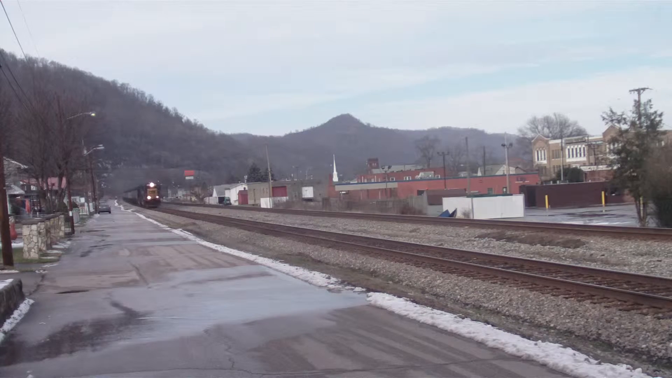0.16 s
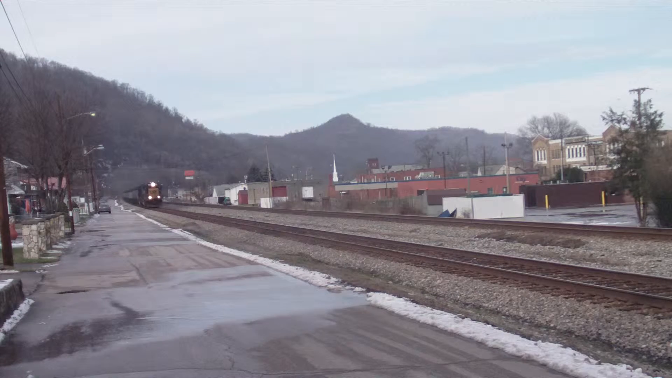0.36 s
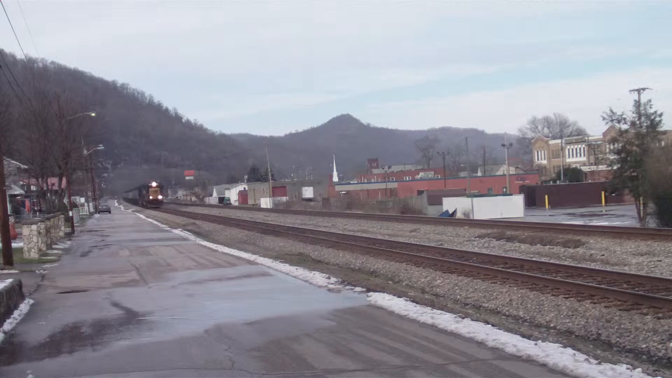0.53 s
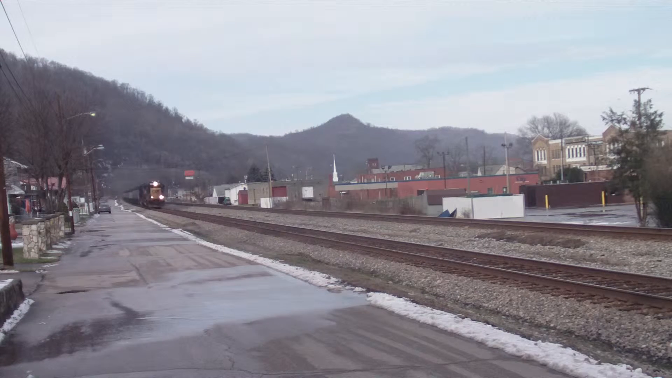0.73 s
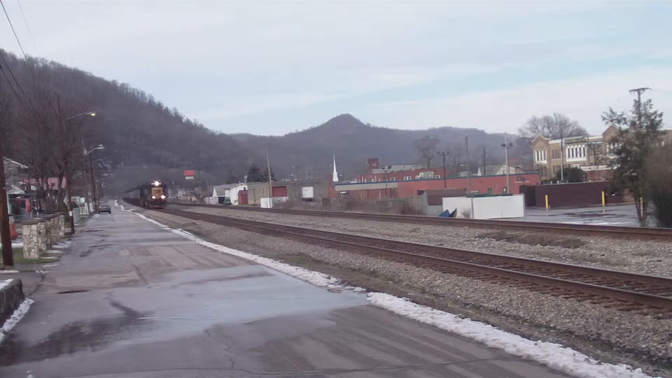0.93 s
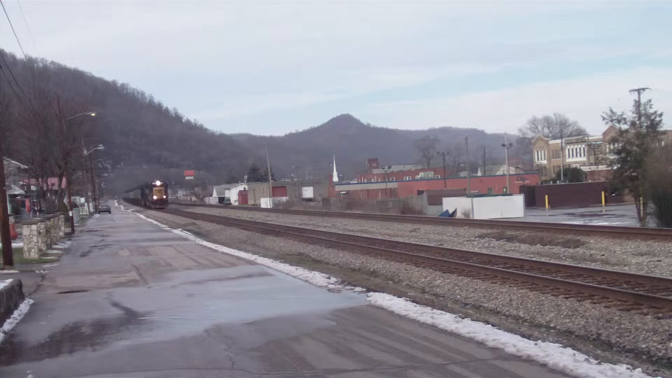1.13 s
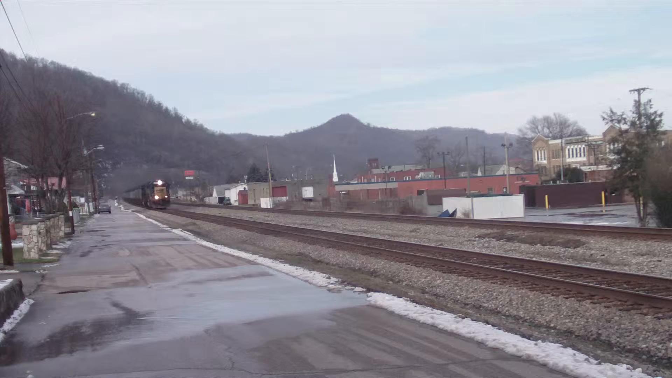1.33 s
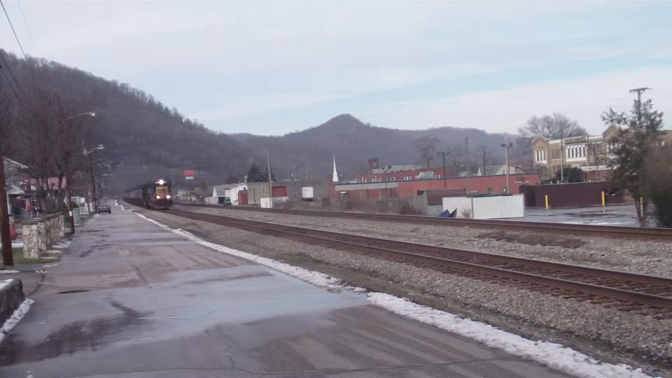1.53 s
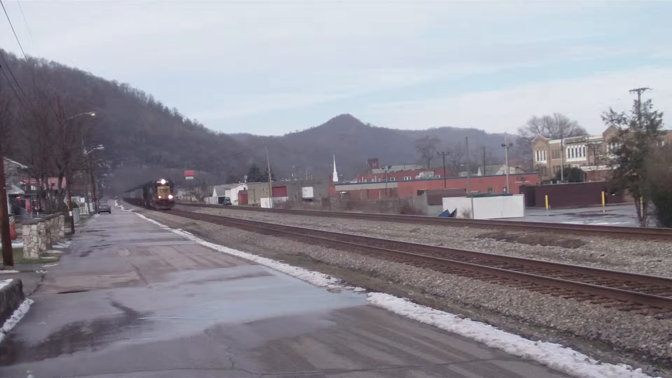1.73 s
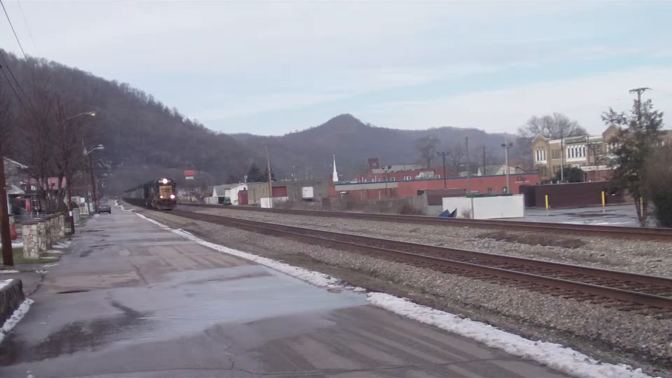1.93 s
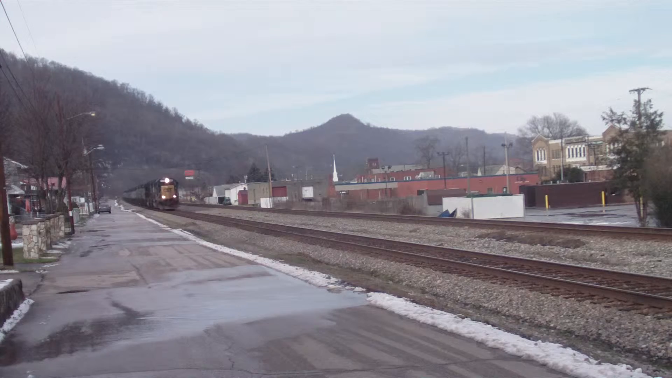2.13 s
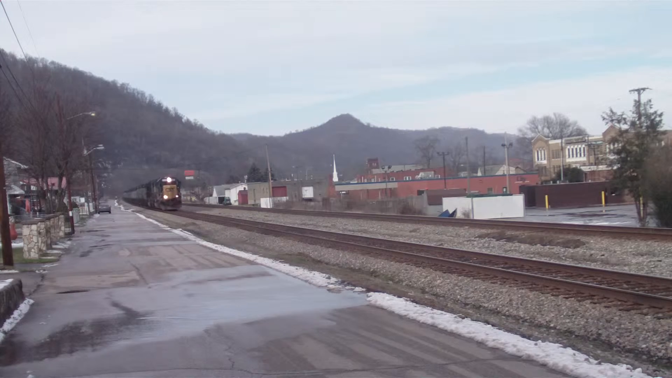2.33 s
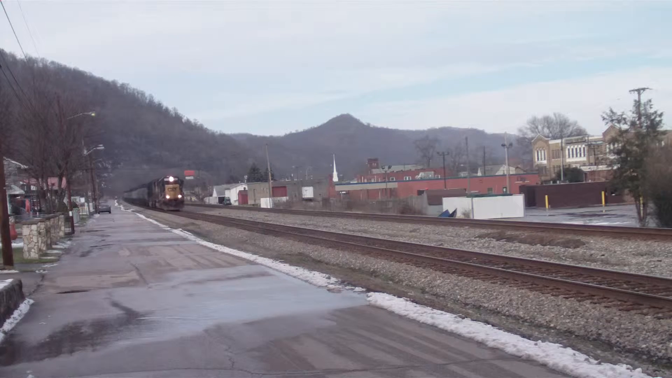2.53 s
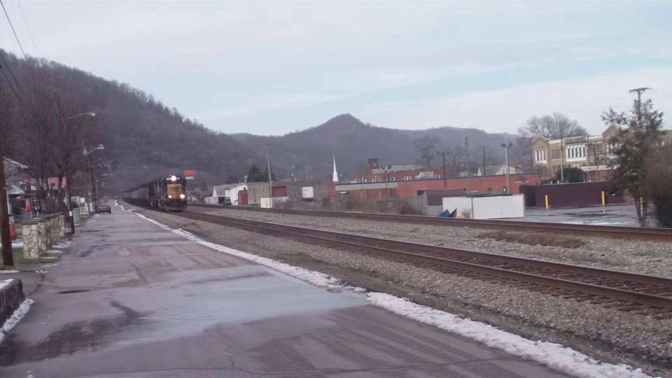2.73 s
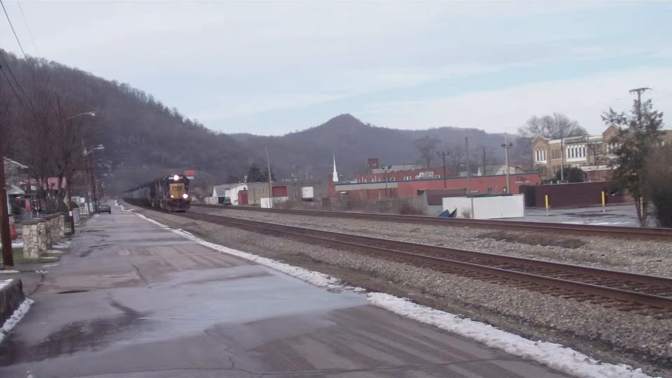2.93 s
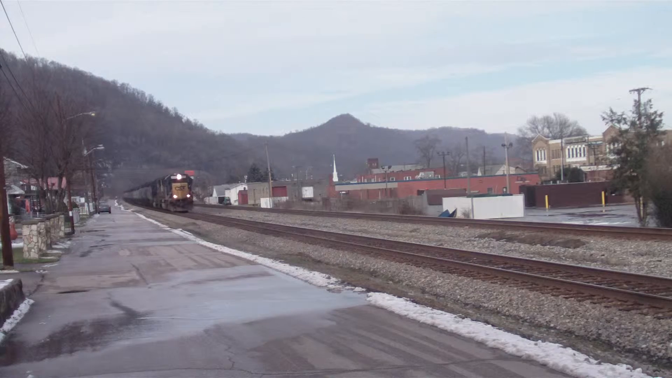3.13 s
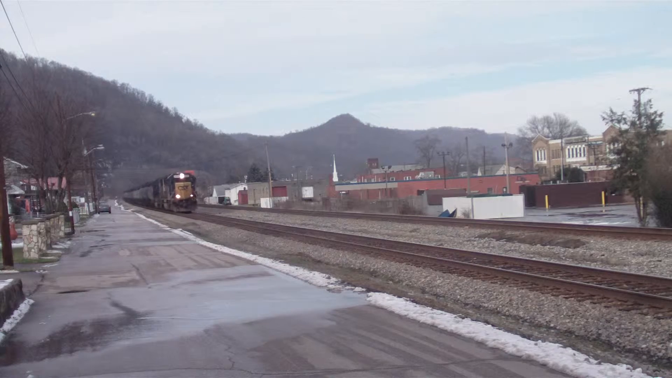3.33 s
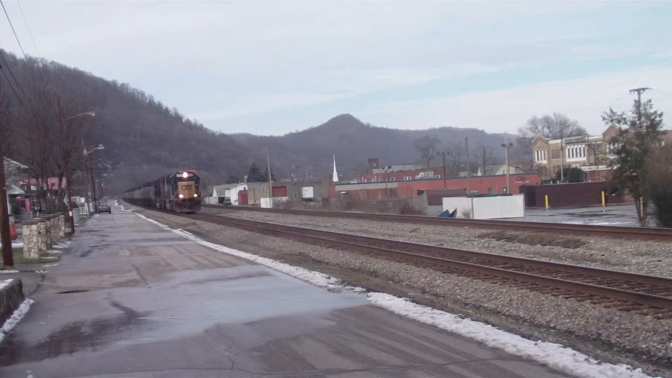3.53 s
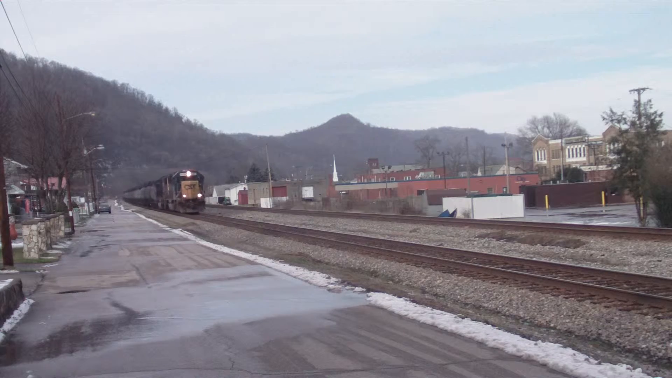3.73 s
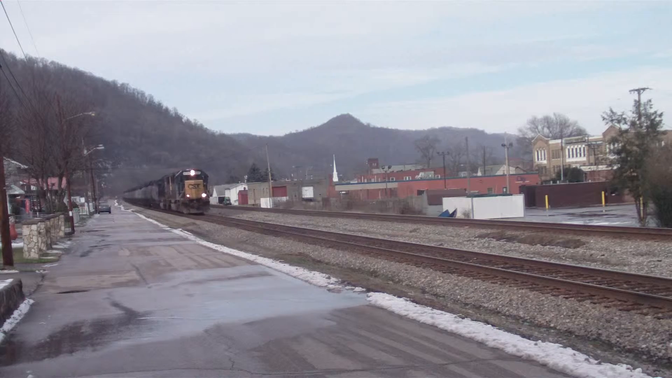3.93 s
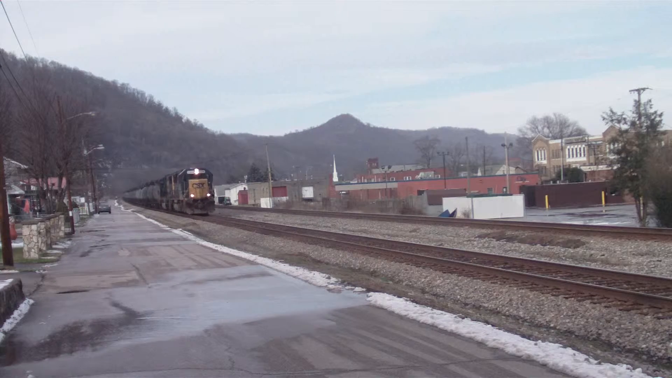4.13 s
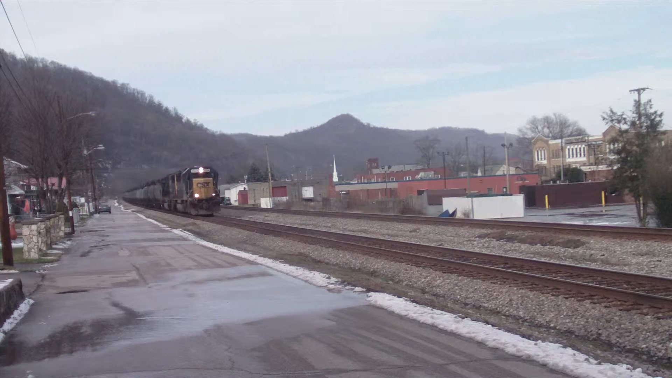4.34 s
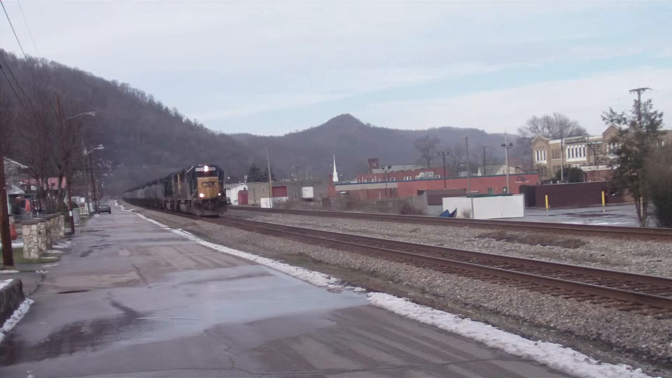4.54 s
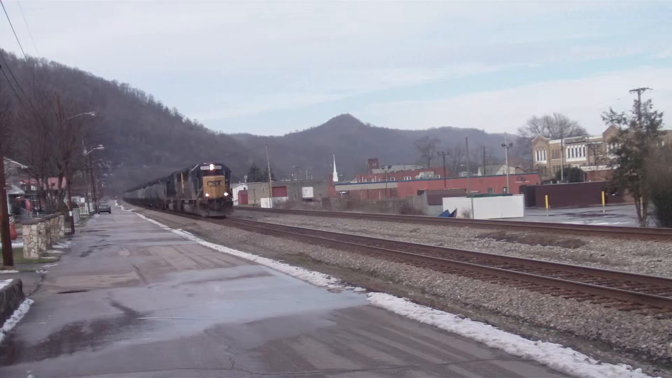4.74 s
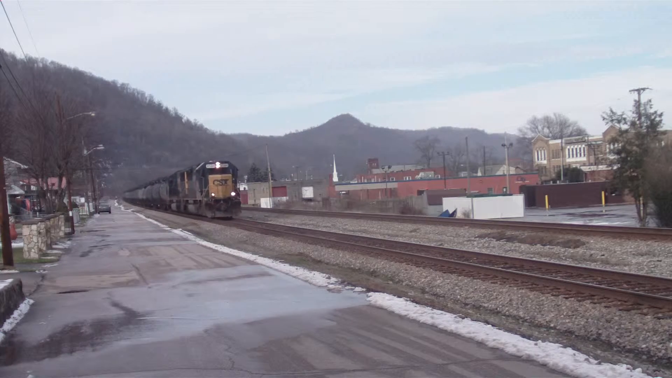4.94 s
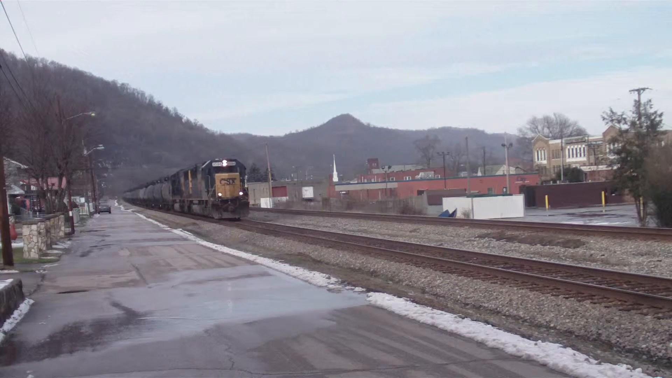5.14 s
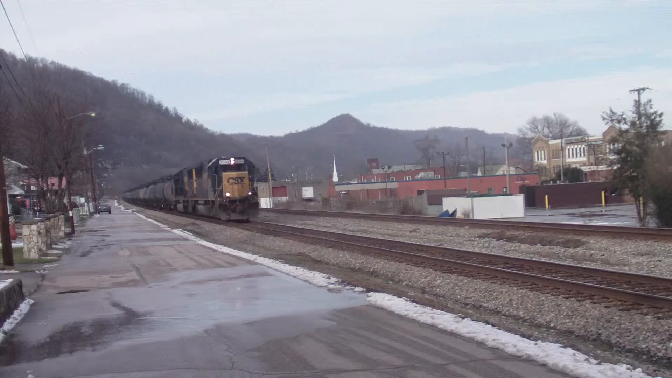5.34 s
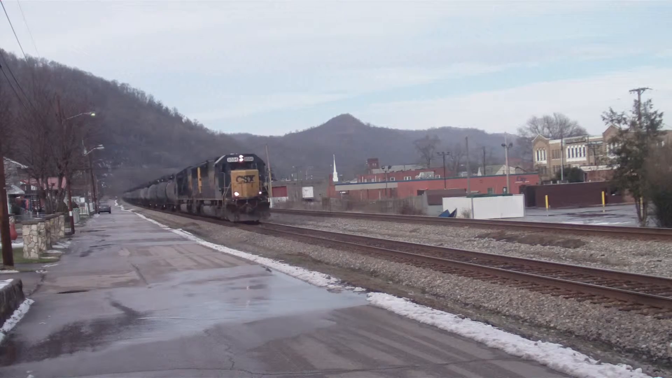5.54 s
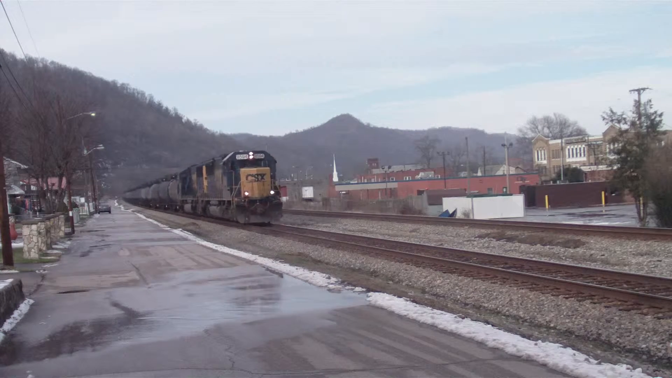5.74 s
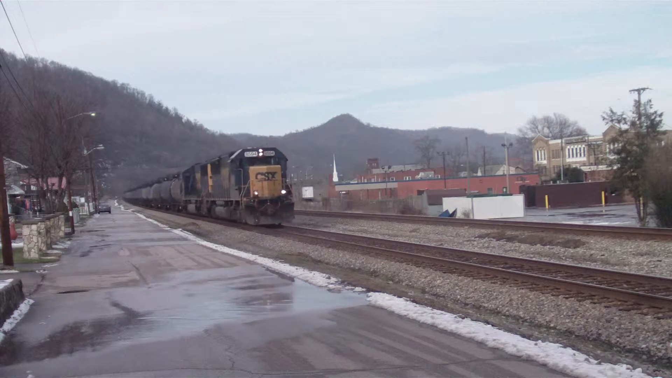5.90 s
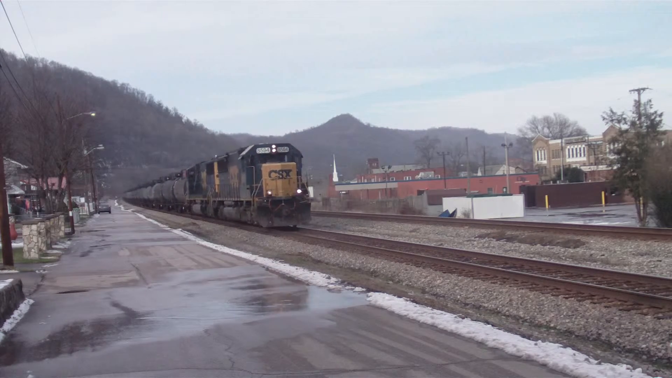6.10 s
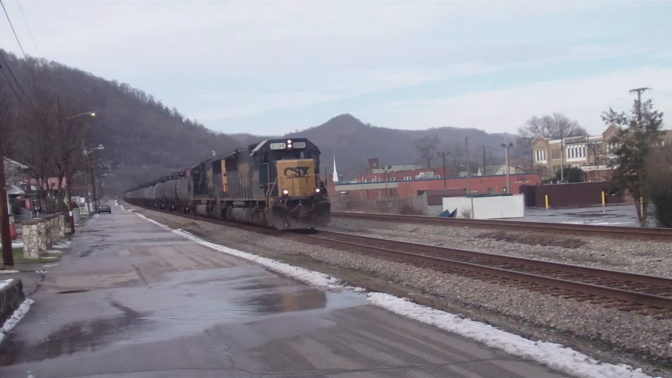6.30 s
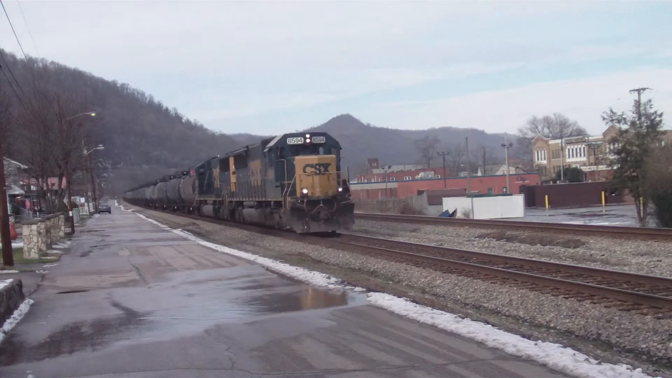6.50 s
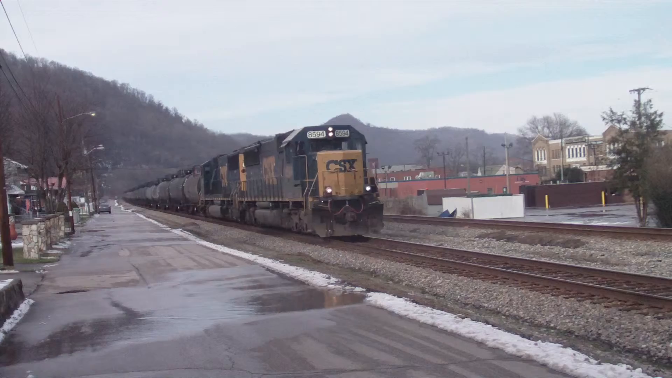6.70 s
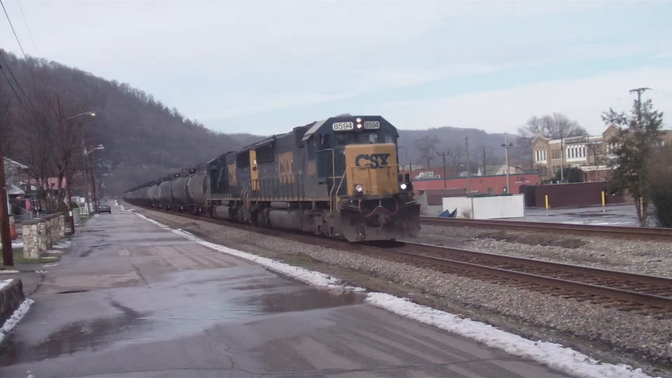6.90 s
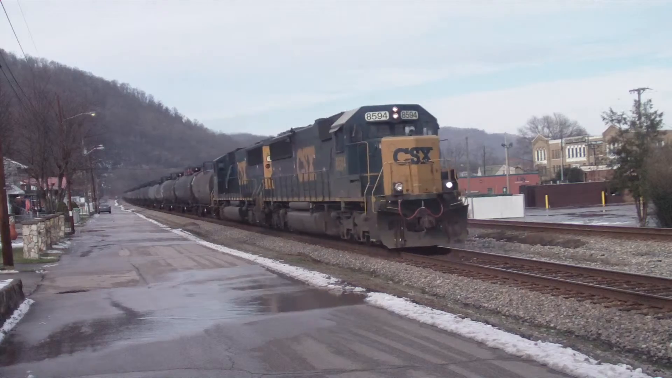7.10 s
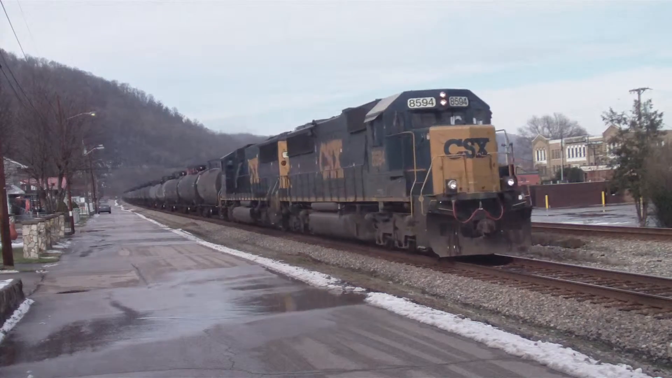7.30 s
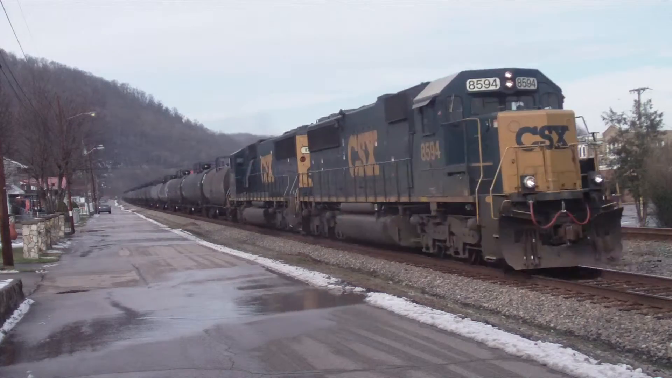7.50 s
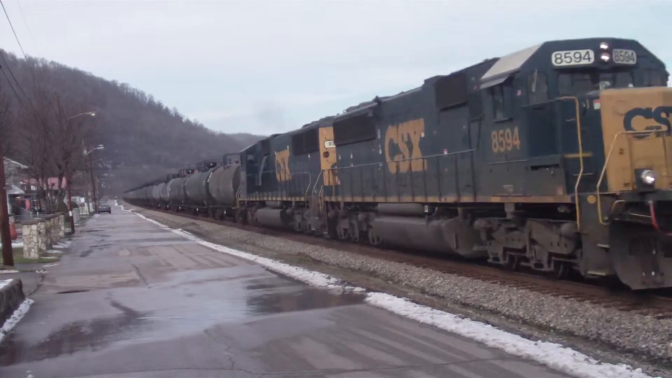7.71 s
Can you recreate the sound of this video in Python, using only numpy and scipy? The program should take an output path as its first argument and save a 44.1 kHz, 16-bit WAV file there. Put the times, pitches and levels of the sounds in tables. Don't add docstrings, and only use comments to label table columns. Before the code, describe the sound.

A freight train hauled by several diesel locomotives rolls closer outdoors, deep throbbing rumble swelling from distant murmur to overwhelming close roar, with gear whine and hissing rails.

```python
import sys
import numpy as np
from scipy import signal
from scipy.fft import rfft, irfft
from scipy.io import wavfile
from scipy.ndimage import uniform_filter1d

SR = 44100
rng = np.random.default_rng(int(sys.argv[2]) if len(sys.argv) > 2 else 0)


def to_linear_factor(level_db):
    exponent = np.asarray(level_db, float) / 20
    return 10 ** exponent


def transcribe(u):
    v = np.clip(np.atleast_2d(u).T, -1, 1)
    q = np.round(v * 32767).astype(np.int16)
    wavfile.write(sys.argv[1], SR, q)


N = 342216
T = np.arange(N) / SR
HOP = 256


def curve(table, at=T):
    s, *columns = np.transpose(table)
    return np.array([np.interp(at, s, c) for c in columns])


def colour(points, hz):
    f, db = np.transpose(points)
    return np.interp(np.log(hz + 1), np.log(f), db)


def walk(rate, count):
    k = max(int(SR / HOP / rate), 1)
    frames = N // HOP + 20
    held = np.repeat(rng.standard_normal((count, frames // k + 1)), k, axis=1)
    slewed = uniform_filter1d(uniform_filter1d(held, k), k)
    return 1.3 * slewed[:, :frames]


def stepped_walk(rate, count):
    return np.repeat(walk(rate, count), HOP, axis=1)[:, :N]


def shaped(db_of, size=2048):
    hz, s, z = signal.stft(rng.standard_normal(N), SR, nperseg=size, noverlap=size - HOP)
    gain = to_linear_factor(db_of(hz[:, None], s)) * np.sqrt(SR / 2)
    return signal.istft(z * gain, SR, nperseg=size, noverlap=size - HOP)[1][:N]


def flicker(hz, frames, slow_db, quick_db):
    band = (3 * np.log2(1 + hz[:, 0] / 30)).astype(int)
    slow = walk(1.5, count=10)[band // 3]
    quick = walk(9, count=30)[band]
    return (slow_db * slow + quick_db * quick)[:, :frames]


def band_level(db, hz, lo_hz, hi_hz):
    inside = (hz > lo_hz) & (hz < hi_hz)
    return 10 * np.log10(np.sum(to_linear_factor(2 * db[inside])) * hz[1, 0])


def add(out, s, sound):
    i = int(s * SR)
    out[i:i + len(sound)] += sound[:N - i]


def band_noise(size, hz, width_hz):
    bins_hz = np.arange(2049) * SR / 4096
    bell = np.exp(-2 * ((bins_hz - hz) / width_hz) ** 2)
    x = irfft(rfft(rng.standard_normal(4096)) * bell)
    return np.resize(x / x.std(), size)


SPEED_M_S, ARRIVES_S, TRACK_M = 15, 8.85, 5


def distance(at):
    return np.hypot(SPEED_M_S * (ARRIVES_S - at), TRACK_M)


def carried(source, at=T):
    near_db, fall_db, loss_db, floor_db = source
    db = near_db - fall_db * np.log10(distance(at) / 10) - loss_db * distance(at)
    return 10 * np.log10(to_linear_factor(2 * db) + to_linear_factor(2 * floor_db))


def swells(table, at=T):
    return sum(db * np.exp(-((at - s) / half) ** 2) for s, db, half in table)


# frequency in Hz, density in dB per Hz.
STREET_COLOUR = [(300, -33.5), (500, -4), (800, 2), (1050, -8), (1600, 2.5), (2500, -18.5), (4000, -44),
                 (6000, -48), (9000, -42.5), (12000, -46), (13000, -47), (15300, -50)]


def street():
    hum = shaped(lambda hz, s: colour(STREET_COLOUR, hz) + flicker(hz, len(s), 0.37, 0.33))
    return to_linear_factor(-53) * hum / hum.std()


# start in seconds, length in seconds, step rate in Hz.
LENS_STEP = (4.109, .019, 1569)
# multiple of the step rate, level in dB.
LENS_OVERTONES = [(4, -58), (5, -49.5), (6, -64), (7, -62), (8, -61)]
# first in seconds, period in seconds, length in seconds, tone in Hz, level in dB.
MOTOR_PIPS = (.004, .1002, .022, 10370, -82)


def camera_motors():
    out = np.zeros(N)
    s, length, hz = LENS_STEP
    u = T[T < length]
    edge = np.clip(np.minimum(u, length - u) / .0012, 0, 1)
    buzz = sum(to_linear_factor(db) * np.sqrt(2) * np.sin(2 * np.pi * k * hz * u) for k, db in LENS_OVERTONES)
    add(out, s, edge * buzz)
    first, period, length, hz, db = MOTOR_PIPS
    gate = (T - first) % period < length
    level = to_linear_factor(db + 2.5 * stepped_walk(8, count=1)[0])
    return out + level * np.sqrt(2) * gate * np.sin(2 * np.pi * hz * T)


# start in seconds, length in seconds, level in dB, then start, middle and end pitch in Hz.
CHIRP_GLIDES = [
    (.625, .045, -75, 5000, 7000, 7000),
    (4.502, .056, -59, 7550, 7350, 5700),
    (4.628, .035, -59, 5760, 5850, 5150),
    (0.548, 0.047, -50, 1530, 1580, 1600),
    (0.855, 0.11, -52, 1565, 1580, 1590),
    (1.178, .05, -52, 1530, 1560, 1600),
    (1.66, 0.04, -48, 1520, 1537, 1610),
    (1.92, 0.033, -46, 1480, 1574, 1580),
    (2.836, 0.054, -51, 1965, 2020, 2020),
    (3.1, 0.043, -50.5, 2240, 2240, 2230),
]


def chirps():
    out = np.zeros(N)
    for s, length, db, *hz in CHIRP_GLIDES:
        u = np.linspace(0, 1, int(length * SR))
        glide = np.polyval(np.polyfit([0, .5, 1], hz, 2), u)
        tone = np.sin(2 * np.pi * np.cumsum(glide) / SR)
        add(out, s, to_linear_factor(db) * np.sqrt(2 * np.sin(np.pi * u)) * tone)
    return out


# start in seconds, length in seconds, level in dB, centre in Hz, width in Hz.
FLANGE_RUBS = [(.83, .09, -72, 13700, 1200), (4.03, 0.089, -70, 14400, 1500),
               (4.572, .05, -60, 14000, 1490), (4.6, .12, -66, 13500, 200),
               (5.327, .08, -54.5, 13900, 1590), (6.187, .04, -58, 13500, 1500),
               (7.22, .035, -45.5, 14600, 1200), (7.25, 0.14, -58, 14800, 406),
               (7.735, 0.025, -46.5, 14600, 1500)]


def squeals():
    out = np.zeros(N)
    for s, length, db, hz, width_hz in FLANGE_RUBS:
        u = np.linspace(0, 1, int(length * SR))
        add(out, s, to_linear_factor(db) * np.sqrt(np.sin(np.pi * u ** .6)) * band_noise(len(u), hz, width_hz))
    return out


# start in seconds, level in dB, centre in Hz, width in Hz, 60 dB decay in seconds.
JOINT_TICKS = [(.0298, -56, 9000, 700, 0.025), (1.3713, -62, 6760, 2000, .08),
               (1.6033, -49, 4000, 6500, 0.11), (1.6154, -59, 4000, 6000, .06),
               (1.9194, -56, 6300, 2000, .02), (2.1256, -51, 5000, 4500, .07),
               (2.2274, -56, 8300, 2500, .02), (2.794, -51, 4500, 6000, .09),
               (3.0934, -60, 4530, 3000, .03), (3.1647, -56, 10500, 2500, 0.022),
               (3.2954, -55, 5000, 3000, .03), (4.3106, -54, 5500, 3000, .03),
               (4.5324, -56, 8500, 4000, .015), (5.05, -58, 9000, 2550, .02),
               (6.343, -36, 7500, 4000, 0.021), (7.4098, -23.5, 7600, 5930, 0.029),
               (6.868, -19.5, 417, 150, 0.33), (7.525, -23.5, 900, 2500, .2),
               (7.662, -19.5, 1210, 3190, 0.26), (7.53, -18, 436, 300, 0.27), (7.665, -18, 400, 250, .25)]


def ticks():
    out, t = np.zeros(N), T[:4096]
    for s, db, hz, width_hz, t60 in JOINT_TICKS:
        decay = to_linear_factor(db - 60 * t / max(t60, .003))
        attack = np.clip(30 * t / t60, 0, 1)
        add(out, s, decay * attack * band_noise(len(t), hz, width_hz))
    return out


# start in seconds, level in dB.
SNAP_EVENT = (5.7519, -22)
# frequency in Hz, level in dB, 60 dB decay in seconds.
SNAP_RINGS = [(3950, -1, 0.013), (4370, -6, 0.0095), (5500, -3, 0.0068), (7090, 2.5, 0.0065),
              (9000, -5, 0.0048), (10500, -3, .005), (12600, -15, 0.0046)]


def snap():
    out, t = np.zeros(N), T[:4096]
    s, snap_db = SNAP_EVENT
    modes = sum(to_linear_factor(snap_db + db - 60 * t / t60) * np.sin(2 * np.pi * hz * t) for hz, db, t60 in SNAP_RINGS)
    add(out, s, np.clip(t / .0003, 0, 1) * modes)
    return out


# centre in Hz, width in Hz, level in dB.
RAIL_HISS = [(11000, 250, -10), (11620, 420, -5), (11780, 80, -4), (12150, 150, -10.5), (12800, 500, -2),
             (13550, 800, -2.5), (14300, 500, -11), (15050, 300, -12)]
RAIL_FLOOR_DB, RAIL_RISE_DB_PER_M, RAIL_TOP_DB, RAIL_FULL_M = -79, .4, -57.5, 39


def rails():
    def db_of(hz, s):
        flutter = 1.3 * walk(9, count=len(RAIL_HISS))[:, :len(s)]
        low = np.array(RAIL_HISS)[:, 0] < 12500
        late = 9.0 * np.outer(low, np.clip((4.2 - s) / 1.2, 0, 1))
        bands = sum(to_linear_factor(2 * (db + k)) / (1 + (2 * (hz - f) / w) ** 4)
                    for (f, w, db), k in zip(RAIL_HISS, flutter - late))
        song_db = RAIL_TOP_DB - RAIL_RISE_DB_PER_M * np.clip(distance(s) - RAIL_FULL_M, 0, None)
        return 10 * np.log10(bands * (to_linear_factor(2 * song_db) + to_linear_factor(2 * RAIL_FLOOR_DB))) - 32
    return shaped(db_of)


# level in dB at 10 m, fall in dB per tenfold distance, loss in dB per m, far floor in dB.
WHINE_PATH = (-11.5, 52, 0.03, -92.5)
# frequency in Hz, level in dB.
GEAR_TONES = [(526.8, -0.5), (876, -9), (1590, -14.5), (371.5, -4.5)]
# centre in seconds, gain in dB, half length in seconds.
WHINE_GROUND = [
    (4.5, 2.5, 0.38),
    (5.5, 6, 0.38),
    (7.1, -20, 0.31),
    (7.7, 2.5, 0.11),
]
# time in seconds, pitch in Hz.
TURBO_PITCH = [(0, 1047), (3, 1002), (5.5, 1028), (7.1, 1026), (7.76, 1030)]
TURBO_HIDDEN_DB, TURBO_CLEAR_DB, TURBO_CLEARS_S, TURBO_STEP_S = -54, -40.5, 5.95, 0.18


def gears():
    level = carried(WHINE_PATH) + swells(WHINE_GROUND)
    clear = (1 + np.tanh((T - TURBO_CLEARS_S) / TURBO_STEP_S)) / 2
    turbo_db = TURBO_HIDDEN_DB + clear * (TURBO_CLEAR_DB - TURBO_HIDDEN_DB)
    tones = [(hz, level + db) for hz, db in GEAR_TONES] + [(curve(TURBO_PITCH)[0], turbo_db)]
    wander = stepped_walk(25, count=10)
    out = np.zeros(N)
    for k, (hz, db) in enumerate(tones):
        turns = np.cumsum(hz * (1 + 0.00498 * wander[k + 5])) / SR
        out += to_linear_factor(db + 2.4 * wander[k]) * np.sqrt(2) * np.sin(2 * np.pi * turns)
    return out


# level in dB at 10 m, fall in dB per tenfold distance, loss in dB per m, far floor in dB.
ROAR_PARTS = [
    (-9, 31.33, 0.027, -92),
    (-16, 34, .001, -45),
    (-27.5, 29.27, 0.021, -89.5),
    (-19.5, 44.2, 0.15, -74.5),
]
# frequency in Hz, density in dB per Hz.
ROAR_SPECTRUM = [(95, -36.5), (125, -14), (170, -11.5), (290, -14.5), (420, -19.5), (750, -30),
                 (1100, -31.5), (1250, -32.5), (2400, -38.5), (4000, -43.5), (6000, -48.5), (8700, -51),
                 (10200, -53.5), (10700, -54.5), (15500, -76)]
# frequency in Hz, width in Hz, gain in dB.
ROAR_RINGS = [(283.5, 37, 5), (375, 49, -5.5), (421, 14.5, 1), (859, 56, 5), (960, 82, 8), (1043, 45, 6.5),
              (1580, 100, 2), (2000, 210, 3), (7200, 1550, 3.5), (9800, 700, 7.5)]
# centre in seconds, gain in dB, half length in seconds.
ROAR_SURGES = [(.9, -1, .25), (1.4, 1.5, .35), (2.03, 1.4, 0.24), (2.61, 0, 0.14), (2.98, 1, 0.27),
               (7.3, 0.5, 0.088), (7.54, 2, 0.016), (7.68, 1, 0.026)]


def roar():
    def db_of(hz, s):
        db = colour(ROAR_SPECTRUM, hz)
        levels = np.array([carried(part, s) for part in ROAR_PARTS]) + swells(ROAR_SURGES, s)
        near = np.clip((levels[3] + 72) / 5, 0, 1)
        close = np.clip(2 - distance(s) / 20, 0, 1)
        rings = 0
        for f, w, gain_db in ROAR_RINGS:
            presence = near if f > 5000 else 1 - .6 * close if f < 300 else 1
            rings = rings + gain_db * presence / (1 + (2 * (hz - f) / w) ** 2)
        edges = [(135, 450), (450, 2500), (2500, 5500), (5500, 11000)]  # Hz, one band a part
        lift = levels - np.c_[[band_level(db, hz, *e) for e in edges]]
        place = np.interp(np.log(hz + 1), np.log([260, 1100, 3600, 8500]), range(4))
        db = db + rings + sum(np.clip(1 - abs(place - k), 0, 1) * lift[k] for k in range(4))
        return db + flicker(hz, len(s), .35, .9)
    return shaped(db_of)


# time in seconds, then lead, second and third engine in Hz.
SHAFT_SPEEDS = [
    (0.0, 13.076, 12.757, 12.708),
    (1.06, 12.373, 11.854, 11.935),
    (1.63, 11.557, 11.86, 11.611),
    (2.53, 11.441, 12.03, 10.84),
    (2.75, 11.549, 12.05, 10.819),
    (3.79, 11.598, 12.063, 10.163),
    (4.98, 11.624, 12.034, 9.999),
    (5.81, 11.593, 12.036, 10.994),
    (7.07, 11.602, 12.023, 11.47),
    (7.76, 11.583, 11.952, 11.23),
]
CRANK_PHASES = [(0.84, 0.561, -0.046), (0.735, 0.575, 0.032), (0.84, 0.235, 0.016)]
# multiple of the shaft speed, then lead, second and third engine in dB.
UNEVEN_FIRING = [(3.0, -30.9, -32.5, -39.9), (4.0, -21.8, -14.0, -31.6), (5.0, -13.4, -11.2, -35.1),
                 (6.0, -14.6, -17.4, -31.0), (7.0, -12.0, -15.8, -25.8), (9.0, -15.6, -15.9, -33.4),
                 (10.0, -37.3, -28.0, -37.5)]
# level in dB at 10 m, fall in dB per tenfold distance, loss in dB per m, far floor in dB.
EXHAUST_PATH = (-7.5, 10, 0.0767, -91)
# frequency in Hz, density in dB per Hz.
GAS_COLOUR = [(15, -18.5), (30, -16.5), (50, -4.5), (85, -3), (108, -8.5), (130, -11.5), (200, -26.5),
              (300, -74.5)]
# centre in seconds, gain in dB, half length in seconds.
LEAD_FADES = [(0.36, 1.7, 0.22), (1.08, -6.5, 0.21), (1.5, 7.2, 0.08), (3.72, 6.4, 0.49),
              (4.68, -10.8, 0.18), (5.01, 5.8, 0.17), (5.64, -4.7, 0.34), (6.22, 5.4, 0.15),
              (6.86, 1.7, 0.11)]
SECOND_FADES = [(2.36, 4.2, 0.49), (3.4, -10.2, 0.14), (3.89, 5.6, 0.09), (4.5, -6.4, 0.43),
                (4.96, 7.4, 0.19), (7.35, 5.3, 0.07)]
THIRD_FADES = [(0.47, -4.7, 0.22), (1.35, -5.8, 0.23), (1.78, 6.2, 0.16), (2.95, 10.5, 0.28),
               (3.29, -12.3, 0.33), (4.54, -7.2, 0.25), (5.45, -13.4, 0.28), (6.17, -9.6, 0.16),
               (6.91, 9.3, 0.28), (7.65, 5.4, 0.23)]
# centre in seconds, gain in dB, half length in seconds.
STACK_SHADOWS = [
    (5.42, 2.5, .08),
    (6.57, -5, .05),
    (6.85, 1.5, .08),
    (7.74, -3.5, .1),
]


def engines():
    start, lag, spread = np.transpose(CRANK_PHASES)[:, :, None]
    turns = np.cumsum(curve(SHAFT_SPEEDS), axis=1) / SR + start
    echoes_db = [swells(e) for e in (LEAD_FADES, SECOND_FADES, THIRD_FADES)]
    firing_db = np.array([-3, -9, -11.5])[:, None] + echoes_db
    out = np.sum(to_linear_factor(firing_db) * np.cos(2 * np.pi * (8 * turns + lag)), axis=0)
    for multiple, *db in UNEVEN_FIRING:
        waver = uniform_filter1d(1.2 * stepped_walk(2.5, count=3), size=HOP)
        tones = np.cos(2 * np.pi * (multiple * turns + lag + spread * (multiple - 8) ** 2))
        out += np.sum(to_linear_factor(np.c_[db] + waver) * tones, axis=0)
    gas = shaped(lambda hz, s: colour(GAS_COLOUR, hz) + 0 * s, size=4096)
    level = to_linear_factor(carried(EXHAUST_PATH) + swells(STACK_SHADOWS))
    return level * (np.sqrt(2) * out + to_linear_factor(-5.5) * gas / gas.std())


def scene():
    mono = street() + camera_motors() + chirps() + squeals() + ticks() + snap()
    mono = mono + rails() + gears() + roar() + engines()
    slow = uniform_filter1d(uniform_filter1d(rng.standard_normal(N), size=700), size=700)
    drift = to_linear_factor(-62) * slow * 45
    return np.array([mono + drift, mono - drift])


def roll_off(x):
    return signal.sosfilt(signal.butter(12, 15200, fs=SR, output="sos"), x)


def record(dry):
    rounded = np.tanh(0.6 * dry) / 0.59
    return roll_off(rounded)


dry = scene()
out = record(dry)
transcribe(out)
```